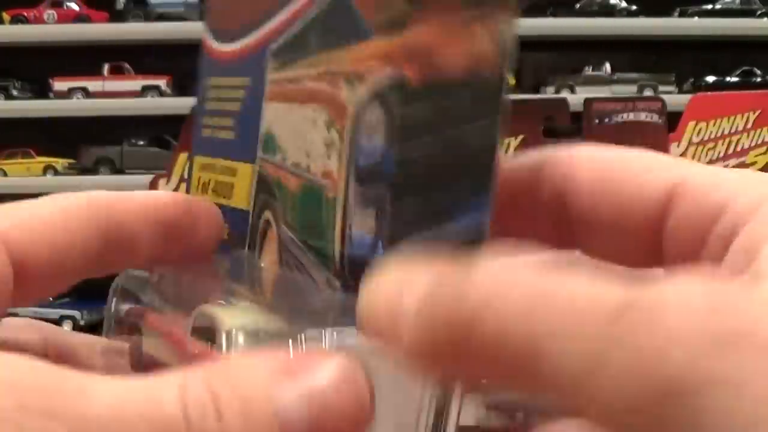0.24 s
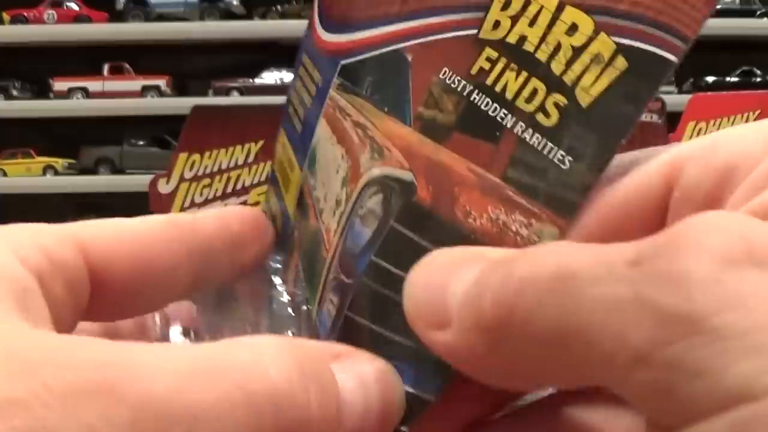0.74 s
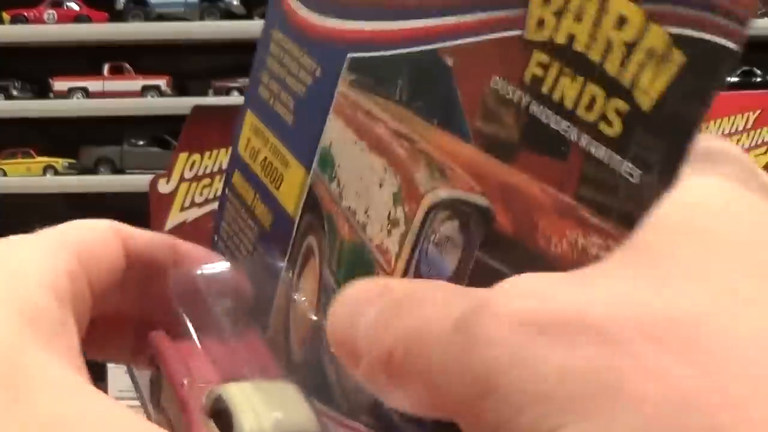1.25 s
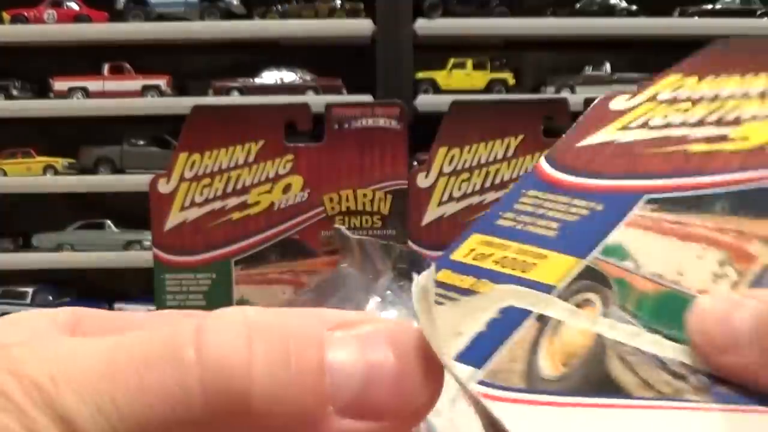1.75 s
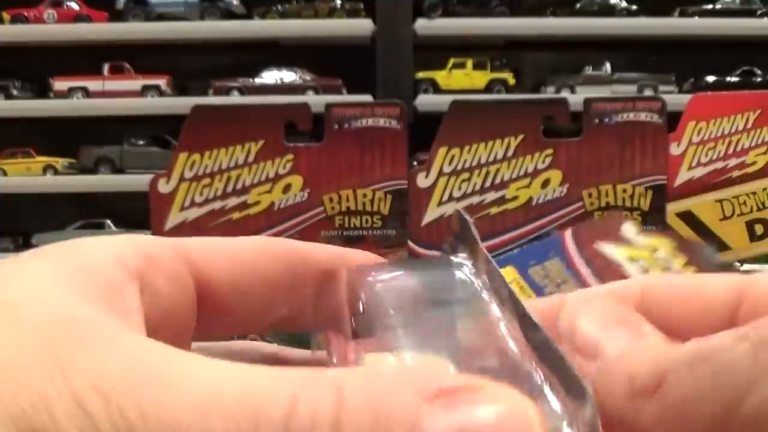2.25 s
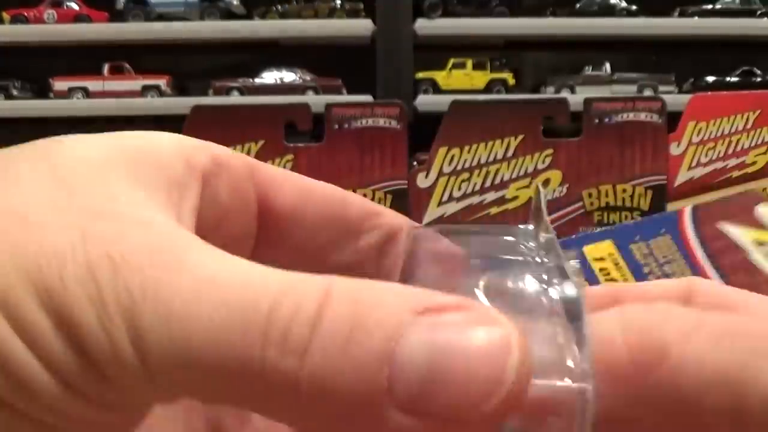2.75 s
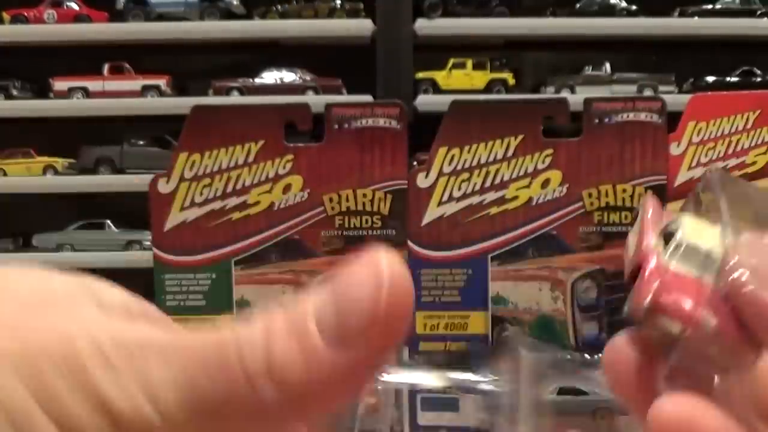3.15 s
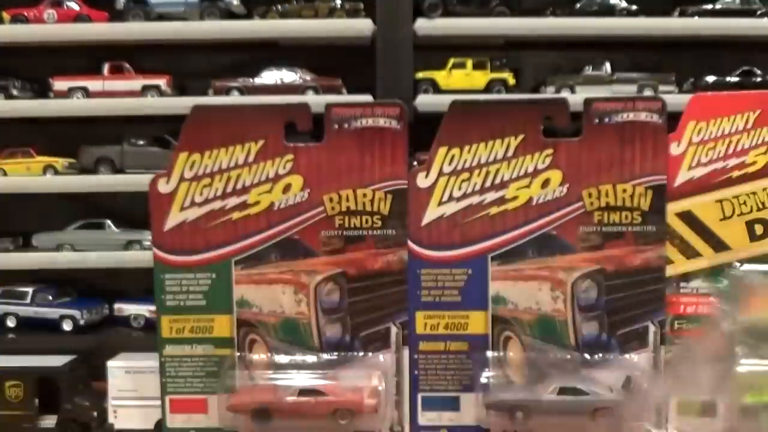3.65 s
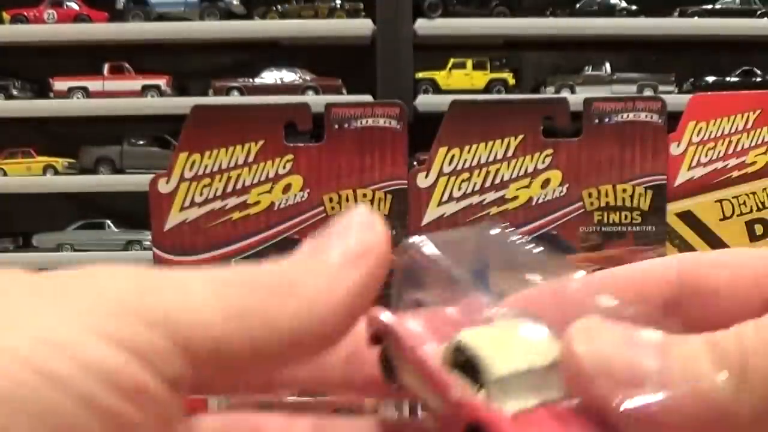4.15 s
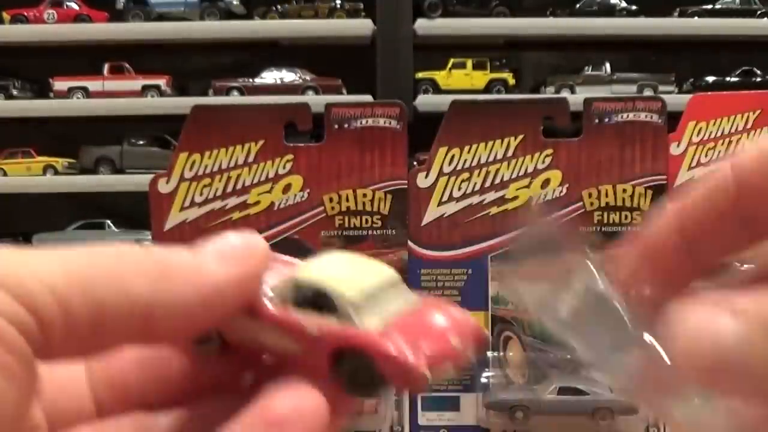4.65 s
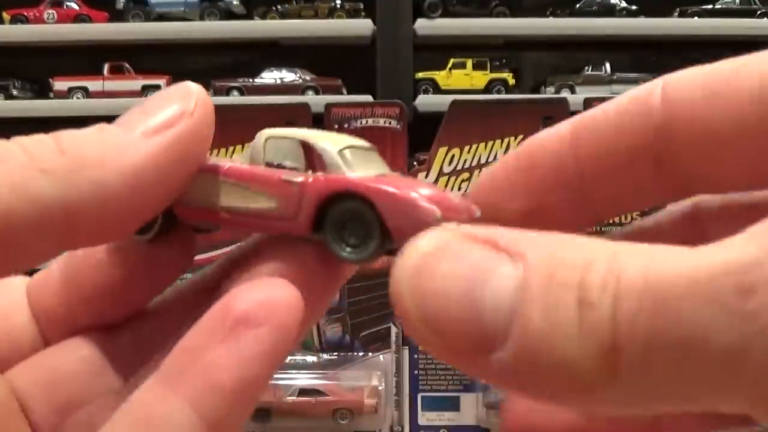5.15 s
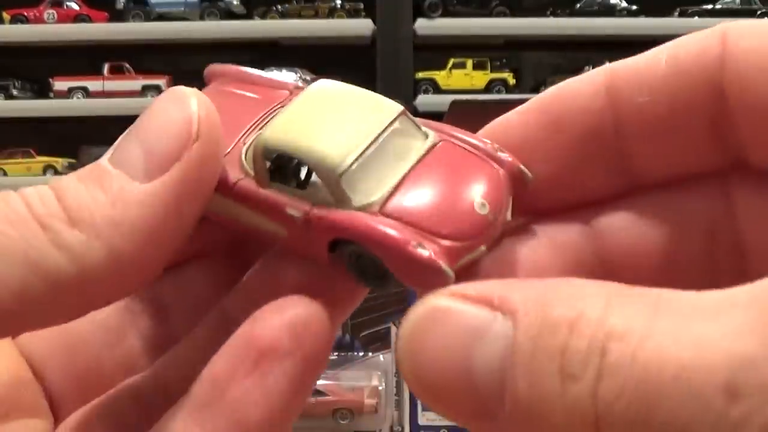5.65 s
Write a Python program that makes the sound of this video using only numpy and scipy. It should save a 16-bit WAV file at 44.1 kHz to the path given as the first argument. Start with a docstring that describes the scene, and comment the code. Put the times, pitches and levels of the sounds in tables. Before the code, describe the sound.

Stiff plastic packaging handled close up indoors. It starts quietly with a light rattle, a few rustles and squeaky creaks, then glue tears in a rapid bright crackle. Irregular snaps, crisp film rustle and hollow plastic pops continue, then calm down to small ticks and a brief creak. A clattering pop sequence like a dropped tray ends it, leaving faint room tone.

```python
"""Blister pack peeled open

Hands close to a phone peel a clear blister off its card, pull out the inner tray and drop it on a table.
Creases snap and glue tears as noise kicks into resonances; hollow pockets pop as damped sine clusters.
Film and card rustle as dense filtered clicks, blister and tray creak by stick and slip, tray and toy tick
as damped modes; soft table thuds, a short decaying-noise room tail and a faint room tone lie below."""
import sys
import numpy as np
from scipy import signal
from scipy.fft import rfft, irfft
from scipy.io import wavfile

SR = 44100
rng = np.random.default_rng(int(sys.argv[2]) if len(sys.argv) > 2 else 0)


def elevation(decibels):
    """Turn decibel levels (scalar or array-like) into linear amplitude ratios."""
    levels = np.asarray(decibels, float)
    return 10 ** (levels / 20)


def output_pcm(signal):
    """Save a mono or channel-first signal as 16-bit PCM at the path in sys.argv[1].

    Samples are clipped to [-1, 1] before scaling.
    """
    pcm = np.clip(np.atleast_2d(signal).T, -1, 1) * 32767
    wavfile.write(sys.argv[1], SR, np.round(pcm).astype(np.int16))


N = 260120  # samples

# creases snapping over: (time [s], facet ring peak [dB], treble crack peak [dB], facet note [Hz])
SNAPS = [(0.125, -19, -22, 2370), (0.198, -21.5, -25.5, 3050), (0.4343, -28.5, -56, 4500),
         (0.544, -15, -23.5, 5400), (0.5617, -32, -30, 3260), (0.5812, -20.5, -25, 1940),
         (0.5964, -20.5, -22.5, 4100), (0.7453, -23, -37, 5940), (0.9862, -15, -2, 2880),
         (1.0782, -13, -7.5, 3720), (1.1375, -5.5, -4.5, 5800), (1.3922, -10.5, -11.5, 4230),
         (1.4577, -24.5, -10.5, 5630), (1.5148, -8.5, -8.5, 3830), (1.5928, -10, -18.5, 2850),
         (1.6087, -17, -5.5, 3250), (1.6146, -11.5, -7, 2500), (1.625, -11, -17, 3520),
         (1.6336, -42.5, -4, 3500), (1.8162, -9, -15.5, 6470), (1.842, -17, -8, 2713),
         (1.848, -23, -13, 3000), (1.8628, -6, -11, 3000), (1.896, -7, -5.5, 3080),
         (1.919, -7.5, -26, 3120), (1.9363, -9, -9, 4060), (2.014, -6, -15, 4040),
         (2.0633, -13, -17.5, 3320), (2.1038, -9.5, -15, 4960), (2.1428, -13, -13.5, 4470),
         (2.2634, -8, -6, 4660), (2.3045, -33, -22, 3100), (2.4243, -9.5, -11, 2300),
         (2.4679, -16, -12.5, 4360), (2.4918, -21, -11.5, 5000), (2.5725, -16.5, -34, 3140),
         (2.6069, -6, -38, 3110), (2.641, -14.5, -20, 3700), (2.6957, -12.5, -7.5, 3900),
         (2.7645, -20, -13, 2500), (2.7995, -13, -22.5, 2950), (2.8248, -13, -17.5, 3040),
         (2.8502, -9.5, -13, 2990), (2.8693, -22.5, -20, 2500), (2.9239, -11.5, -4.5, 5270),
         (2.964, -8.5, -18.5, 3750), (2.9915, -18, -28, 2870), (3.075, -23.5, -46, 3000),
         (3.09, -21, -42, 3050), (3.1298, -6, -7.5, 3400), (3.149, -13.5, -20, 3400),
         (3.1775, -8.5, -9, 3400), (3.261, -18.5, -10.5, 4030), (3.3508, -11.5, -10.5, 2000),
         (3.3805, -9, -7, 3960), (3.3917, -18.5, -7, 2300), (3.4481, -16, -14.5, 2760),
         (3.4967, -11.5, -11, 5500), (3.6475, -32, -9.5, 3040), (3.674, -11, -7.5, 3000),
         (3.7115, -13, -10.5, 4140), (3.743, -22.5, -49, 2600), (3.7814, -14.5, -7.5, 2030),
         (3.7989, -8, -31, 4280), (3.8187, -22.5, -22, 4250), (3.868, -7.5, -26, 4350),
         (3.9358, -10.5, -16, 3100), (3.955, -10, -18, 3940), (3.9837, -14.5, -12.5, 3700),
         (4.0102, -10.5, -14.5, 5570), (4.0276, -13, -30, 4900), (4.05, -19.5, -19.5, 5800),
         (4.078, -18, -19, 2500), (4.1957, -17.5, -26, 2620), (4.226, -16.5, -30.5, 4700),
         (4.2316, -12, -20, 2740), (4.2463, -16, -30, 2640), (4.3875, -28.5, -25.5, 5040),
         (4.705, -22.5, -33, 2300), (4.765, -22.5, -28, 4900), (4.8074, -4.5, -11.5, 2550),
         (4.8178, -3.5, -13, 2650), (4.832, -11, -24, 2650), (4.8423, -16.5, -36, 2240),
         (4.866, -19, -31, 2600), (4.907, -23, -21, 3560), (4.92, -18.5, -28, 2650),
         (4.9328, -22, -27, 2550), (4.9588, -19.5, -43, 2250), (4.9735, -15.5, -17, 2690),
         (5.0777, -9.5, -12.5, 2270), (5.236, -32, -16, 4470)]
SPIKE_GAIN = 0.84  # sharp first tick of a snap, against the fizz

# glued rim tearing off the card in small jerks: (time [s], jerk rate [1/s], treble crack peak [dB])
TEAR = [(1.41, 122, -9.5), (1.439, 145, -6), (1.491, 139, -7), (1.521, 187, -19), (1.575, 195, -10),
        (1.592, 60, -12), (1.636, 11, -16), (1.641, 150, -9.5), (1.72, 110, -10), (1.799, 132, -9),
        (1.841, 127, -7.5)]
TEAR_FACET_DB, TEAR_HZ = -9.5, 3700  # facet ring against the crack; middle note
TEAR_UNEVEN, TEAR_SCATTER_DB, TEAR_FACET_SCATTER_DB = 0.35, 2.5, 3

# hollow pockets and card popping: (time [s], peak [dB], ring [Hz])
POPS = [(0.124, -18.5, 778), (0.194, -27, 1680), (0.239, -21.5, 954), (0.266, -26.5, 685),
        (0.561, -25, 1830), (0.582, -23.5, 1660), (0.6, -16, 706), (0.744, -25, 1570), (0.976, -18, 690),
        (0.983, -15, 973), (1.055, -28, 1730), (1.07, -15, 680), (1.137, -21.5, 590), (1.298, -26, 1010),
        (1.325, -17, 740), (1.356, -30, 670), (1.391, -11.5, 1750), (1.422, -13, 710), (1.472, -15.5, 745),
        (1.515, -14, 626), (1.529, -13.5, 670), (1.685, -16, 620), (1.719, -6.5, 647), (1.766, -20.5, 686),
        (1.842, -16, 659.7), (1.884, -15.5, 626), (1.938, -27, 715), (2.012, -23, 1290),
        (2.063, -19.5, 640), (2.104, -15.5, 575), (2.169, -22.5, 670), (2.42, -14.5, 810),
        (2.607, -13, 1600), (2.693, -20.5, 700), (2.763, -17, 670), (2.869, -21.5, 920), (2.965, -32, 655),
        (3.058, -23, 640), (3.153, -15, 1130), (3.23, -23.5, 1500), (3.2373, -6.5, 1105),
        (3.238, -14.5, 372), (3.268, -17, 1130), (3.286, -16, 1105), (3.332, -16.5, 985), (3.352, -14, 580),
        (3.39, -20, 306), (3.623, -25, 757), (3.784, -13, 1415), (3.793, -14.5, 1965), (3.8, -9.5, 1450),
        (3.82, -13, 713), (3.833, -13.5, 1605), (3.85, -15, 1640), (3.869, -10, 1330), (3.903, -17, 1230),
        (3.923, -15.5, 1310), (3.956, -13, 548), (4.009, -19, 580), (4.078, -17.5, 1490),
        (4.138, -14.5, 1410), (4.169, -25, 1360), (4.21, -19.5, 1550), (4.231, -18.5, 890),
        (4.246, -25, 1530), (4.265, -24, 1600), (4.808, -8.5, 970), (4.829, -18, 964), (4.905, -7, 1080),
        (4.974, -11, 1426), (5.08, -11.5, 1220), (5.129, -18.5, 1410)]
POP_PUSH_DB, POP_PUSH_HZ = -25, 260  # air shoved by a pop: level against its ring, note

# squeezes, pulls and knocks that rustle the pack; swell and fade are the times for 20 dB:
# (peak time [s], swell [s], fade [s], rumble level [dB], hiss level [dB])
GRIPS = [(0.127, 0.0068, 0.18, -47, -42), (0.265, 0.24, 0.029, -43.5, -46),
         (0.435, 0.013, 0.12, -43.5, -39), (0.595, 0.18, 0.048, -42.5, -63),
         (0.657, 0.017, 0.016, -48, -36), (0.741, 0.092, 0.098, -45, -39), (0.98, 0.089, 0.025, -37, -18.5),
         (1.141, 0.082, 0.18, -40, -30), (1.555, 0.23, 0.11, -40.5, -17), (1.558, 0.38, 0.18, -27, -45.5),
         (1.745, 0.22, 0.27, -31, -25), (1.934, 0.25, 0.077, -29.5, -29), (2.103, 0.015, 0.12, -30, -33.5),
         (2.265, 0.056, 0.84, -48, -37.5), (2.427, 0.01, 0.063, -26, -22), (2.6, 0.15, 0.1, -29.5, -27.5),
         (2.766, 0.027, 0.31, -37, -36.5), (2.918, 0.014, 0.0057, -24.5, -21),
         (2.987, 0.084, 0.034, -28, -40.5), (3.068, 0.014, 0.54, -38, -45),
         (3.143, 0.048, 0.057, -33, -36.5), (3.276, 0.086, 0.15, -26.5, -28),
         (3.378, 0.054, 0.09, -25.5, -28), (3.623, 0.006, 0.031, -26, -24),
         (3.655, 0.03, 0.045, -32.5, -22), (3.805, 0.12, 0.17, -25.5, -24.5), (3.96, 0.18, 0.1, -26.5, -51),
         (4.082, 0.0068, 0.18, -31, -44), (4.184, 0.42, 0.095, -39.5, -60),
         (4.38, 0.28, 0.06, -53.5, -47.5), (4.487, 0.11, 0.4, -59, -57.5), (4.712, 0.22, 0.15, -49, -50.5),
         (4.818, 0.0033, 0.069, -17.5, -31), (4.908, 0.0056, 0.033, -28, -49),
         (4.97, 0.016, 0.11, -29, -39), (5.08, 0.0056, 0.1, -26.5, -36.5)]
# fingers shifting between the grips:
# (time [s], rumble level [dB], hiss level [dB], film crackle above its usual share [dB])
HANDS = [(0, -57.5, -70, 0), (.34, -73, -56, 0.5), (.69, -67, -58, -8), (.87, -48, -55, -23),
         (1.02, -36.5, -43.5, 3), (1.27, -66, -79.5, -6), (1.36, -32, -31, -4.5), (1.9, -41, -44, 3),
         (2.0, -81, -71, 2), (2.5, -35.5, -50, 1), (3.04, -56.5, -78, -2), (3.55, -47, -42, 1.5),
         (3.76, -62, -41, -1), (4.0, -29.5, -50, -3.5), (4.4, -87, -58, 6.5), (4.78, -74.5, -83, -1.5),
         (5.0, -55, -57, 1.5), (5.25, -64, -63, -1), (5.9, -75, -90, 13)]
CRACKLE_SHARE = 0.64  # crackle lies this far from the rumble level to the hiss level, in dB

# card and tray resonances under the rumble: (centre [Hz], width [Hz], gain [dB])
CARD = [(262, 115, -5.5), (628, 173, 4), (1080, 214, -1), (1750, 320, 0)]
TRAY = [(260, 96, -6), (580, 160, 3), (1130, 610, -2.5), (1600, 540, 2), (2650, 710, -10)]
CARD_AWAY_S = 2.58  # rumble starts to cross from card to tray
# film resonances under the crackle: (centre [Hz], width [Hz], gain [dB])
FILM = [(2300, 5300, 1), (3220, 640, 10), (4100, 710, 3.5), (5950, 1400, 4)]
# microphone port resonance and the treble above it: (centre [Hz], width [Hz], gain [dB])
PORT = [(7800, 2170, -2), (9880, 1940, 0), (12870, 4900, -14.5), (14660, 600, -19)]

# blister creaking under the thumb, slip by slip: (time [s], peak [dB])
SLIPS = [(0.3608, -38), (0.378, -44), (0.384, -42), (0.393, -37), (0.401, -34), (0.528, -30), (0.637, -33),
         (0.6456, -24), (0.724, -25.5), (0.7794, -28), (0.797, -33), (0.816, -31), (0.8499, -24),
         (0.865, -35), (0.9005, -31), (0.9297, -31), (0.944, -25)]
# tray creaking round the toy: (time [s], level [dB])
TRAY_CREAK = [(4.58, -73), (4.63, -49), (4.69, -39.5), (4.75, -42.5), (4.79, -64)]
TRAY_CREAK_PER_S = 62
# tray wall resonances: (centre [Hz], width [Hz], gain [dB])
TRAY_CREAK_MODES = [(2500, 410, 4), (3400, 910, -0.5)]

# stiff tray ticking against the toy: (time [s], peak [dB])
TICKS = [(4.3745, -25), (4.4105, -24), (4.4765, -28), (4.495, -27), (4.5885, -26)]
# tray modes: (frequency [Hz], level [dB], t60 [s])
TICK_MODES = [(4600, 2, .024), (5300, 0, .016), (5750, -5, .02), (9550, -4, .015), (10100, -3, .015),
              (11050, -2, .02)]
# loose metal toy rattling in the blister: (time [s], peak [dB])
RATTLES = [(.126, -19.5), (.142, -53), (.156, -36), (.2, -20), (.211, -29), (.241, -33), (.269, -26.5)]
# toy modes: (frequency [Hz], level [dB], t60 [s])
TOY_MODES = [(1770, -2, .025), (2466, 0, .04), (3500, -2, .015), (4640, -3, .04), (5300, -2, .02)]

# arms and sleeves leaning on the table: (time [s], level [dB])
THUD = [(.1, -64), (.13, -33), (.22, -61.5), (1.6, -60), (2.2, -60), (2.45, -57), (2.75, -75),
        (3.27, -41.5), (3.45, -49.5), (4.1, -44.5), (4.6, -81), (4.85, -42), (5.4, -81)]
# table top resonances, passed twice: (centre [Hz], width [Hz], gain per pass [dB])
THUD_BODY = [(56.4, 50, -6), (165, 230, 0)]

# hand position: (time [s], left minus right [dB])
PLACE = [(0.0, 0.5), (3.06, -2.5), (3.2, 1.5), (4.14, -4.5), (4.53, 1), (4.75, -2), (5.9, -12.5)]
TABLE_ECHO_S, TABLE_ECHO_DB = 0.0012, -26  # opposite in sign left and right
ROOM_T60_S, ROOM_DB = 0.11, -12.5
# room tone spectrum: (frequency [Hz], relative density [dB per Hz])
ROOM_TONE = [(30, -1), (336, -5), (740, -9.5), (2540, -14.5), (14800, -20), (16000, -31)]
ROOM_TONE_DB = -60
MIC_LOW_HZ, MIC_TOP_HZ = 45.6, 16100
SIDES = np.array([[1], [-1]])  # left, right


def unit(x):
    """Scale to rms 1."""
    return x / np.sqrt(np.mean(x ** 2))


def resonate(x, body):
    """Parallel band-pass resonances, alternating in sign."""
    out = 0
    for k, (hz, width_hz, db) in enumerate(body):
        band = signal.lfilter(*signal.iirpeak(hz, hz / width_hz, fs=SR), x)
        out = out + (-1) ** k * elevation(db) * band
    return out


def scrape_noise(hits, fall_s):
    """Noise under a decay of time constant fall_s after each hit."""
    fall = np.exp(-1 / (fall_s * SR))
    return signal.lfilter([1], [1, -fall], hits) * rng.standard_normal(N)


def clicks(per_s, spread_db, smear_s):
    """Random tiny clicks, many faint and few strong, each a short decaying fizz."""
    strength_db = spread_db * np.minimum(rng.exponential(size=N), 3.5)
    hits = (rng.random(N) < per_s / SR) * elevation(strength_db)
    return scrape_noise(hits, smear_s)


def add(out, at_s, sound, peak_db):
    """Mix a short sound in at the given time and peak."""
    i = int(at_s * SR)
    sound = sound[:N - i]
    out[i:i + len(sound)] += sound * elevation(peak_db) / np.max(np.abs(sound))


def curve(table):
    """Columns of a table of (time [s], value, ..) rows, one value a sample."""
    s, *columns = np.transpose(table)
    return [np.interp(np.arange(N) / SR, s, c) for c in columns]


def flips(rows, trail_db):
    """Flipping plastic: facet and film ring, the treble cracks, a weak fizz trails."""
    out, t = np.zeros(N), np.arange(1500) / SR
    flip = (1 - np.exp(-t / 0.0003)) ** 2 * elevation(-60 * t / 0.005)
    shape = flip + elevation(trail_db - 60 * t / 0.045)
    for s, facet_db, crack_db, hz in rows:
        noise = rng.standard_normal(len(t))
        spike = SPIKE_GAIN * np.sign(noise[0]) * (np.arange(len(t)) == 12)
        kick = noise * shape + spike
        note = np.sin(2 * np.pi * hz * t) * elevation(-60 * t * hz / 60)  # 60 dB down in sixty cycles
        facet = resonate(kick, [(hz, 0.071 * hz, 4)] + list(FILM))
        add(out, s, 0.27 * note + facet, facet_db)
        add(out, s, -resonate(kick, PORT), crack_db)
    return out


def snaps():
    """Each crease flips within a millisecond."""
    return flips(SNAPS, -20)


def tear():
    """Stick and slip along the glue line: snap-like jerks at uneven steps, with a drier trail."""
    s, per_s, db = np.transpose(TEAR)
    chance = rng.standard_normal((80, 4))
    t = np.arange(s[0], s[-1], 1 / SR)
    due = np.cumsum(np.interp(t, s, per_s)) / SR  # jerks due by time t
    steps = np.cumsum(np.exp(TEAR_UNEVEN * chance[:, 0]))
    at_s = np.interp(steps, due, t)
    crack_db = np.interp(at_s, s, db) + TEAR_SCATTER_DB * chance[:, 1]
    facet_db = crack_db + TEAR_FACET_DB + TEAR_FACET_SCATTER_DB * chance[:, 2]
    hz = np.clip(TEAR_HZ * np.exp(0.39 * chance[:, 3]), 2000, 6500)
    rows = np.transpose([at_s, facet_db, crack_db, hz])
    return flips(rows[steps < due[-1]], -30)


def rings(hz, t60_s, chance, scatter, t):
    """Cluster of damped modes scattered round hz, the first exactly on it."""
    moved = np.arange(chance.shape[1]) > 0
    mode_hz = np.clip(hz * np.exp(scatter * chance[0] * moved), 0.559 * hz, 9000)[:, None]
    life_s = t60_s * np.exp(0.082 * chance[1])[:, None]
    return np.sum(np.sin(2 * np.pi * mode_hz * t) * elevation(-60 * t / life_s), axis=0)


def pops():
    """A soft push makes a pocket ring, with shorter neighbour modes and a rough clatter round it."""
    out, t = np.zeros(N), np.arange(4000) / SR
    push = (1 - np.exp(-t / 0.0009)) ** 2
    shove = elevation(POP_PUSH_DB - 60 * t / 0.046) * np.sin(2 * np.pi * POP_PUSH_HZ * t)
    for s, db, hz in POPS:
        t60_s = 0.017 + 16 / hz
        note = np.sin(2 * np.pi * hz * t) * elevation(-60 * t / t60_s)
        neighbours = rings(hz, 0.31 * t60_s, rng.standard_normal((2, 6)), 0.471, t)
        band = [(1.2 * hz, 1.2 * hz, 0)]
        rough = resonate(resonate(rng.standard_normal(len(t)), band), band)
        clatter = unit(rough) * elevation(-60 * t / 0.03)
        add(out, s, push * (note + 0.46 * neighbours + 0.71 * clatter + shove), db)
    return out


def grips():
    """Rumble, crackle and hiss levels [dB]: grips swell and fade over the shifting fingers."""
    t = np.arange(N) / SR
    *shifting_db, film_db = curve(HANDS)
    power = elevation(shifting_db) ** 2
    for s, swell_s, fade_s, rumble_db, hiss_db in GRIPS:
        swell, fade = (s - t) / max(swell_s, 0.004), (t - s) / max(fade_s, 0.004)
        shape_db = -20 * np.where(t < s, swell, fade)
        power = power + elevation(shape_db + np.array([[rumble_db], [hiss_db]])) ** 2
    rumble_db, hiss_db = 10 * np.log10(power)
    crackle_db = rumble_db + CRACKLE_SHARE * (hiss_db - rumble_db) + film_db
    return rumble_db, crackle_db, hiss_db


def rustle():
    """Dense clicks shake card, tray and film; one shared stream ties the bands together."""
    rumble_db, crackle_db, hiss_db = grips()
    shared = unit(clicks(400, 3.2, 0.0024))
    low = shared + 0.83 * unit(clicks(700, 4.5, 0.0034))
    middle = shared + 0.46 * unit(clicks(950, 1.2, 0.0059))
    high = shared + 0.74 * unit(clicks(1800, 5, 0.003))
    to_tray = np.clip((np.arange(N) / SR - CARD_AWAY_S) / 0.44, 0, 1)
    rumble = (1 - to_tray) * unit(resonate(low, CARD)) + to_tray * unit(resonate(low, TRAY))
    crackle = unit(resonate(middle, FILM))
    hiss = unit(resonate(high, PORT))
    return elevation(rumble_db) * rumble + elevation(crackle_db) * crackle - elevation(hiss_db) * hiss


def blister_slips():
    """Each slip rings the blister wall near 1.8 kHz and, weaker, the card and the film."""
    out, t = np.zeros(N), np.arange(1200) / SR
    body = [(1770, 160, 5), (694, 90, -1), (1100, 120, -4), (3900, 1500, -19)]  # (Hz, width Hz, dB)
    for s, db in SLIPS:
        kick = rng.standard_normal(len(t)) * elevation(-60 * t / 0.0031)
        add(out, s, resonate(kick, body), db)
    return out


def tray_creak():
    """Stick and slip: uneven steps, each a brief scrape, ring the plastic."""
    uneven, scatter_db = 0.22, 5.3
    chance = rng.standard_normal((720, 2))
    at = (np.cumsum(np.exp(uneven * chance[:, 0])) / TRAY_CREAK_PER_S * SR).astype(int)
    hits = np.zeros(N)
    hits[at[at < N]] = elevation(scatter_db * chance[at < N, 1])
    sound = unit(resonate(scrape_noise(hits, 0.003), TRAY_CREAK_MODES))
    t = np.arange(N) / SR
    active = (t > TRAY_CREAK[0][0]) * (t < TRAY_CREAK[-1][0])
    return sound * elevation(curve(TRAY_CREAK)[0]) * active


def ticks(rows, body):
    """A short noisy contact rings the same modes each time, slightly detuned and in other shares."""
    out, t = np.zeros(N), np.arange(3000) / SR
    hz, mode_db, t60_s = np.transpose(body)[:, :, None]
    for s, db in rows:
        detune, share = rng.standard_normal((2, len(body), 1))
        wave = np.sin(2 * np.pi * hz * (1 + 0.006 * detune) * t)
        modes = wave * elevation(mode_db + 3 * share - 60 * t / t60_s)
        contact = rng.standard_normal(400) * elevation(-60 * t[:400] / 0.012)
        ringing = np.convolve(np.sum(modes, axis=0), contact)
        add(out, s, ringing + 6 * np.pad(contact, (0, len(t) - 1)), db)
    return out


def thud():
    """Soft bumps in the table top: sparse smeared clicks through low resonances, twice."""
    bumps = clicks(80, 2.44, 0.012)
    return unit(resonate(resonate(bumps, THUD_BODY), THUD_BODY)) * elevation(curve(THUD)[0])


def room(x):
    """Shelves and walls: a decaying noise tail, duller with time, partly different left and right."""
    t = np.arange(int(0.3 * SR)) / SR
    common, apart = rng.standard_normal((2, len(t)))
    side = 0.24 * apart + 0.46 * resonate(apart, [(3300, 5800, 0)])
    tails = common + side * SIDES
    dull = signal.lfilter([0.3], [1, -0.7], tails)
    bright = 0.5 * tails * elevation(-60 * t / 0.045)
    tails = (dull + bright) * elevation(-60 * t / ROOM_T60_S) * (1 - np.exp(-t / 0.0005))
    tails = tails / np.sqrt(np.sum(tails ** 2) / 2)
    return signal.fftconvolve(x[None], tails, axes=1)[:, :N]


def coloured(points):
    """Noise of rms 1 with a spectrum of (Hz, dB) points."""
    hz, db = np.transpose(points)
    f = np.arange(N // 2 + 1) * SR / N + 1
    gain = elevation(np.interp(np.log(f), np.log(hz), db))
    return unit(irfft(rfft(rng.standard_normal(N)) * gain, N))


def room_tone():
    """Steady coloured noise, mostly common to both sides."""
    return elevation(ROOM_TONE_DB) * (coloured(ROOM_TONE) + 0.15 * coloured(ROOM_TONE) * SIDES)


def scene():
    """Everything the hands do, placed left or right, in the room."""
    near = snaps() + tear() + pops() + rustle() + blister_slips() + tray_creak()
    near = near + ticks(TICKS, TICK_MODES) + ticks(RATTLES, TOY_MODES)
    # the phone body shades mainly the middle frequencies, so mainly they move sideways
    pan = np.tanh(curve(PLACE)[0] * np.log(10) / 40)
    side = resonate(near, [(3000, 9200, 0.0093)]) * pan
    notched = near - resonate(near, [(9000, 9000, 0.0009)])
    side = side + elevation(TABLE_ECHO_DB) * np.roll(notched, int(TABLE_ECHO_S * SR))
    heard = near + side * SIDES + elevation(ROOM_DB) * room(near) + thud()
    low_cut = signal.butter(2, MIC_LOW_HZ, "high", fs=SR, output="sos")
    return signal.sosfilt(low_cut, heard) + room_tone()


def band_limit(x):
    """A steep low-pass at the top of the band."""
    return signal.sosfilt(signal.butter(12, 16970, fs=SR, output="sos"), x)


def record(dry):
    """The microphone rolls off the top; the phone rounds the loudest peaks."""
    top_cut = signal.butter(6, MIC_TOP_HZ, fs=SR, output="sos")
    soft = signal.sosfilt(top_cut, dry)
    return band_limit(np.tanh(1.018 * soft) / 1.233)


dry = scene()
out = record(dry)
output_pcm(out)
```